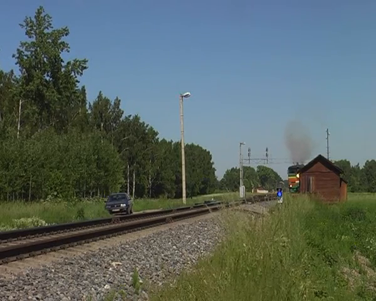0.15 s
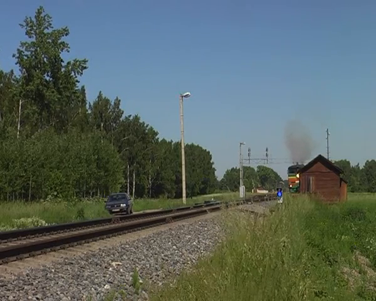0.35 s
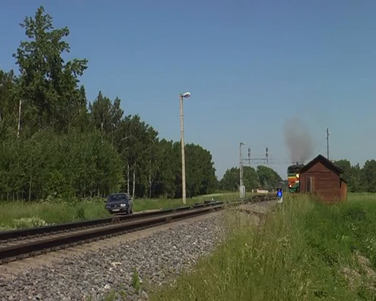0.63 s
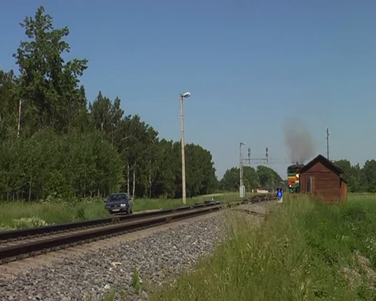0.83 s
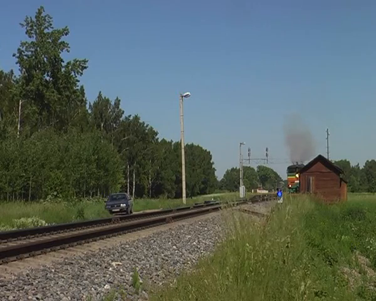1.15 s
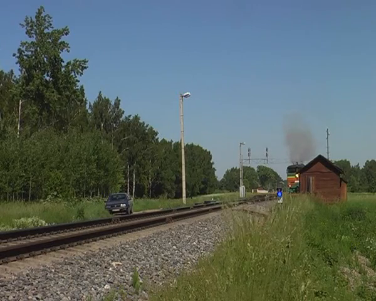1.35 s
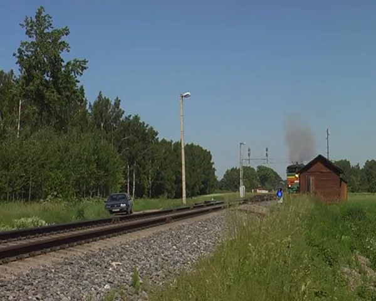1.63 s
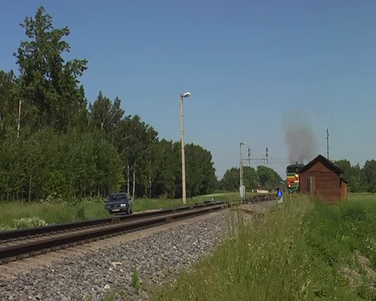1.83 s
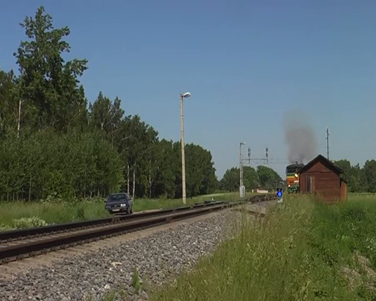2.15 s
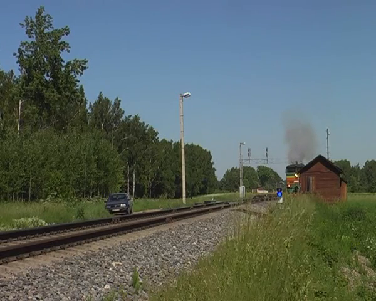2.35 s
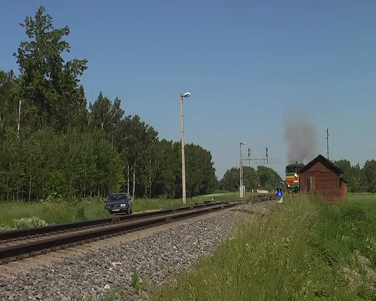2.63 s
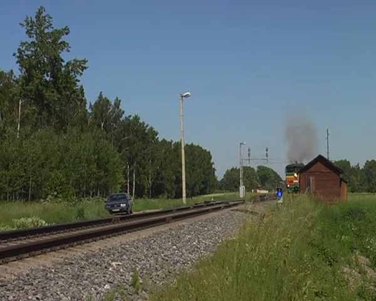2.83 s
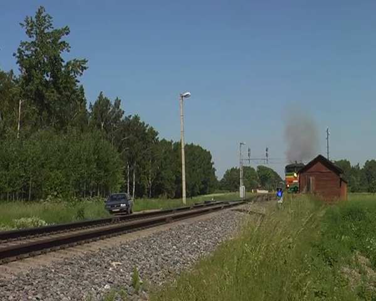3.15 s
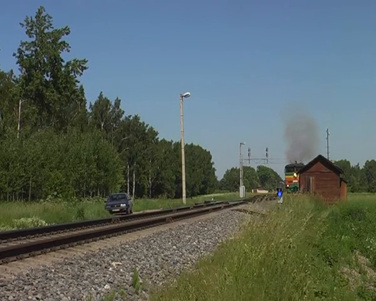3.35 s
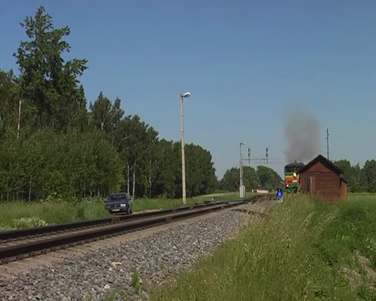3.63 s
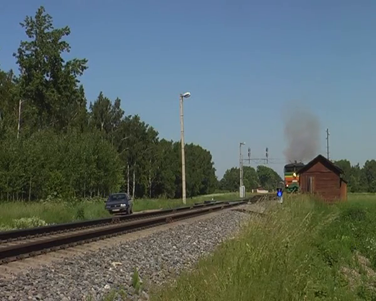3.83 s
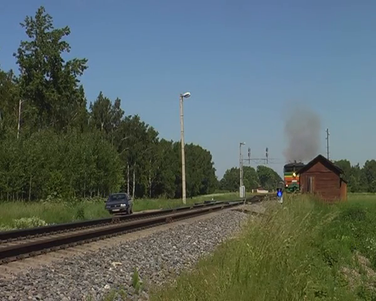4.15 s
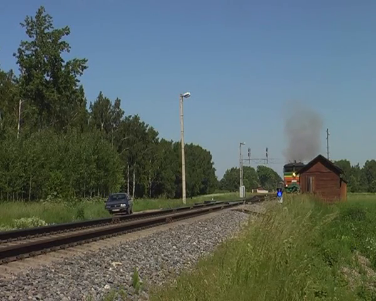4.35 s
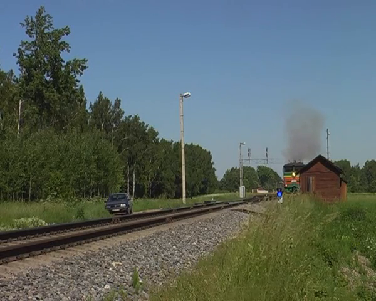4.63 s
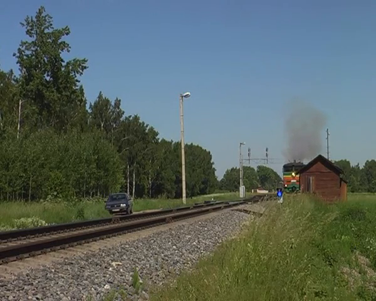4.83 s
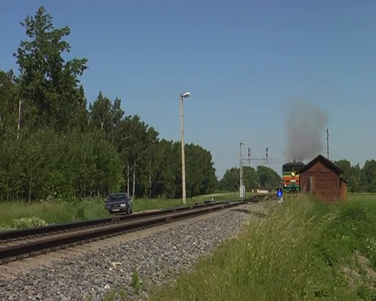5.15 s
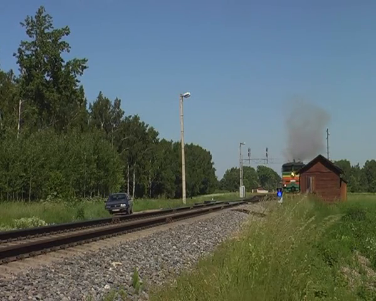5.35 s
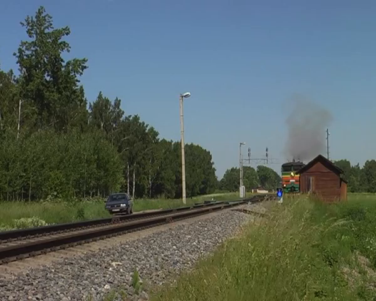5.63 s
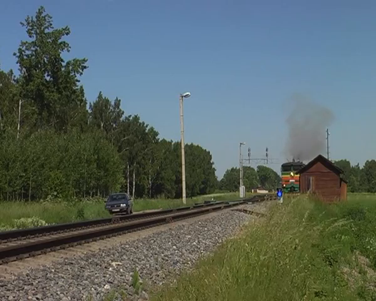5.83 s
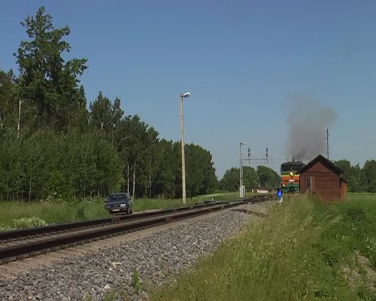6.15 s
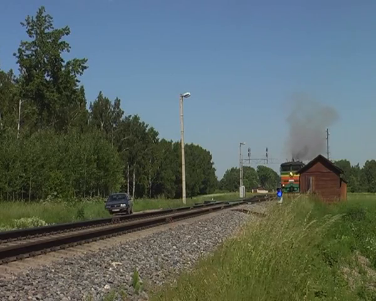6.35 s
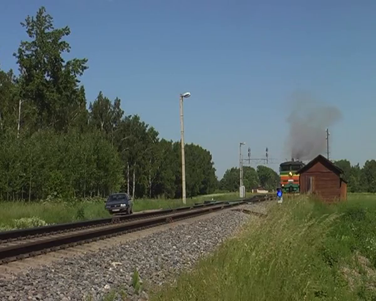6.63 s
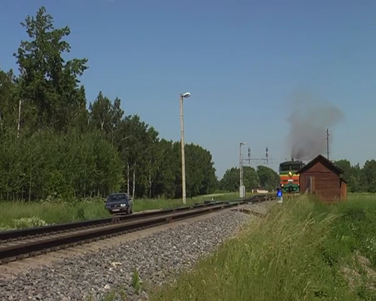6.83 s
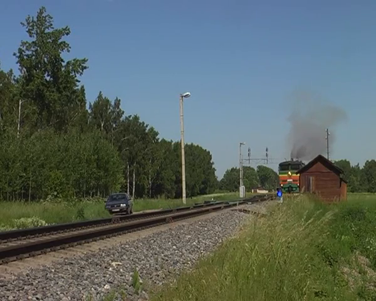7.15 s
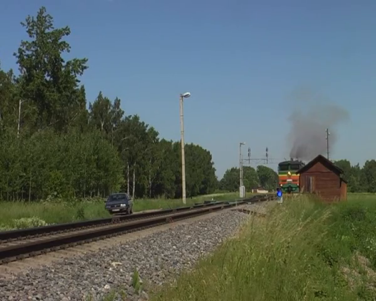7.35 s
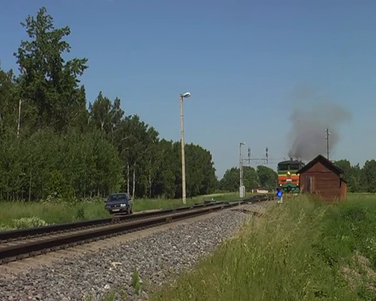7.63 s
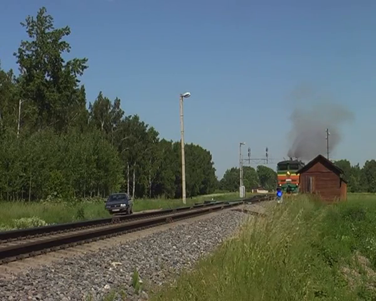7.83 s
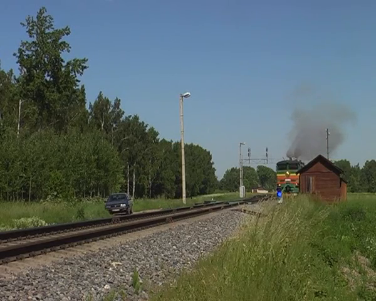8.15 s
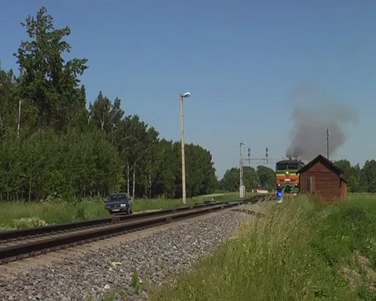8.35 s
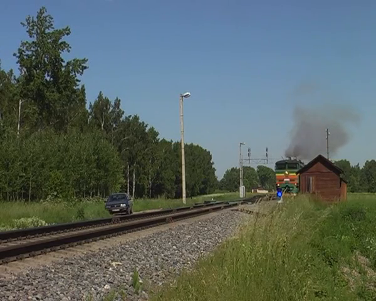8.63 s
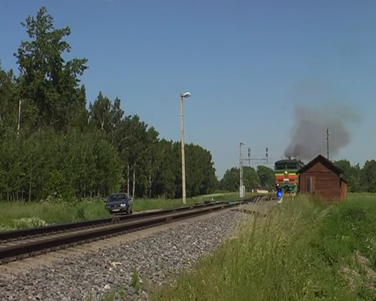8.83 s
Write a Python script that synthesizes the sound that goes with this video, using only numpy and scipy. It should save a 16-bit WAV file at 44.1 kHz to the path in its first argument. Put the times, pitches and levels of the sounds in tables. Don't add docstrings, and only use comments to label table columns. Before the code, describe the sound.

Low, pulsing diesel drone from a distant freight train grows gradually throughout, its two engines drifting in speed against each other. Quick bird trills, chatter and falling notes sound close to the left, with softer chirps from the trees. Dry grass snaps occasionally. As the locomotive clears a small trackside hut, the exhaust becomes fuller and the blower and gear whines rise. Open country air, with faint hiss at the microphone.

```python
import sys
import numpy as np
from scipy import signal
from scipy.fft import rfft, irfft
from scipy.io import wavfile
from scipy.ndimage import uniform_filter1d

SR = 44100
rng = np.random.default_rng(int(sys.argv[2]) if len(sys.argv) > 2 else 0)


def gain_from_db(level_db):
    decades = np.asarray(level_db, float) / 20
    return 10 ** decades


def to_wav(s):
    ch = np.atleast_2d(s).T
    pcm = np.round(np.clip(ch, -1, 1) * 32767)
    wavfile.write(sys.argv[1], SR, pcm.astype(np.int16))


N = 396900
PORTS = np.array([[1], [-1]])


def evened(x):
    return x / np.sqrt(np.mean(x ** 2) + 1e-20)


def read(points, hz):
    f, value = np.transpose(points)
    return np.interp(np.log(hz + 1), np.log(f + 1), value)


def curves(rows):
    s, *columns = np.transpose(rows)
    return [np.interp(np.arange(N) / SR, s, column) for column in columns]


def add(mix, start_s, sound):
    part = mix[:, round(start_s * SR):][:, :sound.shape[1]]
    part += sound[:, :part.shape[1]]


def drift(per_s, size=1):
    knots = np.arange(0, N / SR + 1, .5 / per_s)
    values = rng.standard_normal(400)[:len(knots)]
    return np.interp(np.arange(0, N, size) / SR, knots, values) * 0.42


def unsteady(length, size):
    return evened(uniform_filter1d(rng.standard_normal(8000), size=size))[:length]


def resonate(x, hz, width_hz):
    turn = np.exp(2j * np.pi * np.cumsum(hz) / SR)
    r = np.exp(-np.pi * width_hz / SR)
    return 2 * (turn * signal.lfilter([1 - r], [1, -r], x / turn)).real


def motor():
    drum_hz, level_db = 300, -88.0
    multiples = [27, 28, 29, 30, 33, 34, 36, 37]
    t, out = np.arange(N) / SR, 0
    for k in multiples:
        tone_db = level_db - 0.67 * (k - multiples[0])
        out = out + np.sqrt(2) * gain_from_db(tone_db) * np.sin(2 * np.pi * k * drum_hz * t + k * k)
    return out


# start_s, peak_db, left_minus_right_db
GRASS_SNAPS = [
    (0.2369, -43, -4),
    (4.8597, -41, 2),
    (5.224, -46, -0.5),
    (6.288, -45.5, -3.5),
    (6.9223, -46, 0),
]


def grass():
    out, t = np.zeros((2, N)), np.arange(300) / SR
    hz, width_hz = 7000 + 0 * t, 6000
    for start_s, peak_db, lean_db in GRASS_SNAPS:
        ring = resonate(resonate(rng.standard_normal(300), hz, width_hz), hz, width_hz)
        add(out, start_s, gain_from_db(peak_db + 0.5 + lean_db * PORTS / 2) * ring * np.exp(-t / .001))
    return out


# pitch_hz, left_minus_right_db
BIRD_LEAN = [(2500, 5.5), (3500, 5), (4200, 3.5), (5000, -0.5), (6000, -3.5)]


def sung(wave, hz, level_db, edge=0.2):
    lean_db = read(BIRD_LEAN, hz) * PORTS / 2
    return gain_from_db(level_db + lean_db) * evened(wave) * signal.windows.tukey(len(wave), min(edge, 1))


def throat(hz, level_db, flutter_db, wobble_hz, edge=.18):
    hz = hz + wobble_hz * unsteady(len(hz), 90)
    angle = 2 * np.pi * np.cumsum(hz) / SR
    flutter = gain_from_db(flutter_db * unsteady(len(hz), 150))
    return sung((np.sin(angle) + 0.014 * np.sin(2 * angle)) * flutter, hz, level_db, edge)


def whistle(length_s, start_hz, middle_hz, end_hz, level_db, flutter_db=2.5):
    bend = np.polyfit([0, .5, 1], [start_hz, middle_hz, end_hz], 2)
    hz = np.polyval(bend, np.linspace(0, 1, round(length_s * SR)))
    return throat(hz, level_db, flutter_db, wobble_hz=52)


def glide(length_s, start_hz, end_hz, level_db, flutter_db=1.0):
    middle_hz = start_hz + .7 * (end_hz - start_hz)
    return whistle(length_s, start_hz, middle_hz, end_hz, level_db, flutter_db)


def hook(length_s, start_hz, held_hz, level_db, bend_s=.003, flutter_db=-1.5):
    t = np.arange(round(length_s * SR)) / SR
    hz = held_hz + (start_hz - held_hz) * np.exp(-t / bend_s)
    return throat(hz, level_db, flutter_db, wobble_hz=25, edge=.1)


def trill(length_s, start_hz, end_hz, level_db, beats_per_s, sweep=0.33, dip=0.55):
    swing_hz = 8200.0 * sweep / np.sqrt(beats_per_s)
    beat = 2 * np.pi * beats_per_s * np.arange(round(length_s * SR)) / SR
    hz = np.linspace(start_hz, end_hz, len(beat)) - swing_hz * np.cos(beat - .6)
    hz = hz + 70 * unsteady(len(beat), 60)
    angle = 2 * np.pi * np.cumsum(hz) / SR
    wave = (np.sin(angle) + 0.015 * np.sin(2 * angle)) * (1 - dip * np.cos(beat))
    return sung(wave, hz, level_db, edge=0.31)


def rasp(length_s, start_hz, end_hz, width_hz, level_db):
    hz = np.linspace(start_hz, end_hz, round(length_s * SR))
    breath = rng.standard_normal(3000)[:len(hz)]
    for width in (width_hz, width_hz, 2 * width_hz):
        breath = resonate(breath, hz, width)
    return sung(breath, hz, level_db)


# start_s, length_s, pitch_hz, level_db
WOOD_HELD = [(0.668, .031, 4550, -51), (0.837, .045, 3450, -54), (0.952, .03, 4600, -52.5),
             (2.153, 0.1, 4620, -52.5), (2.449, 0.063, 4330, -50), (2.521, .04, 4310, -55),
             (2.707, 0.056, 4440, -52.5), (3.838, 0.071, 6430, -60), (3.919, .06, 6370, -58),
             (4.131, .095, 6430, -62), (4.271, .028, 6090, -61), (4.43, .04, 4600, -59),
             (4.422, 0.071, 6730, -58), (5.022, 0.05, 3500, -46), (5.137, .032, 4550, -48),
             (5.313, .022, 3480, -47.5), (5.351, .057, 3540, -54.5), (5.401, 0.04, 4490, -50),
             (5.859, 0.03, 4510, -51.5), (6.524, .031, 3940, -53), (6.576, 0.062, 3910, -55),
             (6.725, 0.071, 5860, -56.5), (6.796, 0.17, 5760, -61), (7.385, 0.1, 5830, -62),
             (7.603, .045, 2295, -53), (5.265, .03, 3400, -51.5)]
# start_s, length_s, start_hz, end_hz, level_db
WOOD_GLIDES = [(0.699, .034, 4530, 3900, -51), (0.987, .035, 4500, 3960, -52),
               (2.676, 0.032, 3510, 4560, -54), (2.927, 0.11, 3210, 3750, -62),
               (4.328, .03, 7230, 6440, -57), (4.469, 0.065, 6760, 5400, -57.5),
               (4.601, 0.097, 6940, 5730, -58.5), (4.67, 0.042, 5980, 4720, -55.5),
               (4.772, .092, 6730, 5590, -59), (4.84, .035, 5950, 4780, -51.5),
               (5.164, .044, 4430, 3600, -52.5), (5.554, 0.033, 4330, 4010, -49.5),
               (5.577, .022, 4000, 3600, -50), (5.596, .055, 3650, 2980, -56.5),
               (5.308, .015, 3780, 3520, -49.5), (5.671, 0.056, 3600, 2850, -54),
               (0.673, .02, 3110, 3110, -52.5), (0.797, .035, 3100, 3330, -58),
               (.832, .012, 3790, 3570, -55), (1.512, .025, 4410, 4400, -57.5),
               (1.592, .05, 3200, 2880, -59), (1.7, .05, 2464, 3100, -58), (1.76, .03, 3170, 2970, -59),
               (3.34, .012, 5750, 5750, -54), (3.386, .012, 3600, 3470, -53.5),
               (3.4, .018, 4620, 4400, -55), (3.678, .014, 4930, 4950, -58.5),
               (3.513, .01, 4980, 4950, -59), (3.515, .008, 4030, 4400, -54), (5.713, .05, 2940, 2940, -64),
               (5.845, .022, 4990, 4470, -53), (5.885, .016, 4790, 5400, -54),
               (7.677, .014, 3270, 3210, -44), (7.827, .012, 3490, 3490, -52),
               (7.85, 0.013, 3840, 4080, -49), (7.958, .008, 4440, 4460, -49.5),
               (8.053, .022, 2500, 2340, -46.5), (7.575, .025, 3120, 3050, -53),
               (.168, .008, 2400, 2150, -50), (3.835, .06, 5950, 5850, -61.5),
                (4.0, .035, 7050, 6900, -63), (4.275, .055, 7050, 6950, -64),
                (4.125, .012, 3200, 3900, -52), (4.14, .022, 5400, 5600, -59),
                (4.482, .012, 7000, 6600, -60), (4.135, .02, 6950, 6500, -65),
                (5.435, .018, 4600, 3350, -51), (5.4, .012, 4700, 5000, -55.5),
                (5.505, .018, 4450, 4600, -58), (5.65, .018, 3300, 3350, -58.5),
                (7.797, .014, 7600, 8500, -62), (7.845, .018, 6200, 6700, -58),
                (6.4, .01, 7600, 5200, -53.5), (7.032, .012, 5300, 4500, -44)]


def wood_birds(flutter_db=2.5):
    out = np.zeros((2, N))
    for start_s, length_s, hz, level_db in WOOD_HELD:
        add(out, start_s, hook(length_s, hz, hz, level_db, flutter_db=flutter_db))
    for start_s, *note in WOOD_GLIDES:
        add(out, start_s, glide(*note, flutter_db))
    first_s, every_s = 4.957, .123
    for k in range(5):
        rising = hook(.043, 3450.5, 4750.5, -47.5, bend_s=.016, flutter_db=flutter_db)
        add(out, first_s + k * every_s, rising)
    return out


# start_s, length_s, start_hz, end_hz, level_db
FALLS = [(0.291, 0.0092, 6000, 5880, -42.5), (0.3, 0.018, 5260, 4370, -33.5),
         (0.565, 0.0072, 4160, 3630, -48), (2.905, .015, 4310, 3770, -42.5), (3.062, .023, 3750, 3760, -45),
         (3.832, 0.042, 5840, 4100, -54.5), (3.3, .025, 4660, 4330, -37), (6.933, 0.033, 5560, 3840, -38),
         (7.157, .016, 4250, 3320, -39), (7.174, .012, 4440, 2940, -39.5), (7.056, .024, 4100, 3840, -35),
         (7.447, .01, 5030, 3660, -41), (7.464, .008, 4800, 3300, -41), (7.8, .018, 5710, 4850, -44.5),
         (7.984, 0.0057, 5740, 5570, -39.5), (7.994, .011, 5540, 4580, -38.5),
         (3.175, .046, 4100, 3520, -35.5), (7.185, .007, 3660, 2930, -39)]
RISES = [(2.891, 0.011, 4380, 4690, -45), (3.017, .017, 3430, 3710, -39), (3.153, .02, 3420, 3510, -34),
         (3.43, 0.021, 2360, 2560, -47.5), (6.873, 0.012, 3700, 4530, -43.5),
         (7.198, .018, 2970, 3440, -38), (7.293, .023, 3560, 3660, -55), (7.475, 0.028, 3290, 3530, -39.5),
         (7.813, 0.021, 4650, 5830, -43.5), (7.835, .02, 4710, 5930, -45), (7.953, 0.006, 3970, 5820, -44)]
# start_s, length_s, start_hz, held_hz, level_db
HOOKS = [
    (3.044, .026, 4450, 3800, -34.5),
    (6.891, .016, 5930, 4700, -42.5),
    (6.914, 0.016, 5870, 4900, -36),
    (7.223, 0.035, 4140, 3714, -35.5),
    (7.516, 0.033, 4170, 3790, -35.5),
]
# start_s, length_s, turning_hz, depth_hz, level_db
DIPS = [
    (3.454, .013, 3360, 699, -44.5),
    (3.477, .011, 3280, 1200, -44),
    (3.497, .015, 3410, 1099, -45),
    (7.343, .031, 5880, -650, -40),
    (5.818, 0.028, 5140, -300, -49.5),
    (7.856, .014, 4840, 249, -43.5),
    (7.961, 0.008, 5830, -150, -42.5),
]
# start_s, length_s, centre_hz, level_db, beats_per_s
TRILLS = [(.318, 0.052, 3720, -36, 80), (.425, .048, 3095, -38.5, 98), (3.01, 0.0077, 3630, -43, 220),
          (3.135, 0.019, 3400, -48, 160), (3.86, 0.058, 3800, -46, 88), (3.975, 0.04, 3150, -46.5, 130),
          (4.31, 0.07, 4540, -43.5, 120), (4.375, .05, 4640, -55, 100), (4.435, .045, 2970, -49, 66),
          (7.319, 0.037, 4920, -41, 120), (3.277, 0.026, 4780, -45, 120), (7.04, 0.026, 4170, -37.5, 120)]
SINKING_TRILLS = [
    (.036, 0.043, 3310, -33, 238),
    (3.333, .032, 3940, -46.5, 210),
    (3.567, .037, 3320, -40, 228),
    (7.692, 0.037, 3020, -42.5, 98.5),
    (8.004, .035, 3610, -44, 89.6),
    (8.039, .022, 3070, -44, 90),
]
# start_s, length_s, pitch_hz, width_hz, level_db
RASPS = [(3.335, .022, 7250, 2426, -60), (3.68, 0.013, 4430, 510, -53), (3.727, .045, 4890, 1500, -56),
         (5.894, .01, 2865, 704, -48), (7.322, .037, 9000, 3000, -68.5), (7.35, .012, 11700, 603, -65.5),
         (7.788, 0.027, 7900, 3020, -62), (7.878, .015, 10100, 1200, -64),
         (8.051, .027, 10320, 1200, -63.5), (7.906, .012, 10500, 1200, -68),
         (7.947, .016, 10600, 1300, -67), (8.085, .01, 10400, 900, -66), (7.822, .02, 11500, 600, -70),
         (8.925, .012, 11000, 1500, -72)]
# steps_start_s, scratch_start_s
CHATTER = [
    (.137, .19),
    (.534, .582),
]
# delay_s, length_s, start_hz, end_hz, level_db
CHATTER_STEPS = [
    (0, .011, 5400, 5300, -48),
    (.002, .012, 4980, 4920, -48),
    (.004, .013, 4480, 4400, -48.5),
    (.006, .022, 3280, 3490, -45),
    (0.012, 0.019, 2790, 2690, -48.5),
]
CHATTER_SCRATCH = [
    (0.00053, 0.018, 3400, 4400, -39.5),
    (.022, 0.013, 4300, 5750, -44),
    (0.022, 0.011, 7500, 8800, -62.5),
]


def warbler():
    out = np.zeros((2, N))
    for start_s, *note in FALLS + RISES:
        add(out, start_s, glide(*note))
    for start_s, *note in HOOKS:
        add(out, start_s, hook(*note))
    for start_s, length_s, hz, depth_hz, level_db in DIPS:
        add(out, start_s, whistle(length_s, hz + depth_hz, hz, hz + depth_hz, level_db))
    for table, sink_hz_per_s in ((TRILLS, 0), (SINKING_TRILLS, 25000)):
        for start_s, length_s, hz, level_db, beats_per_s in table:
            half_hz = sink_hz_per_s * length_s / 2
            add(out, start_s, trill(length_s, hz + half_hz, hz - half_hz, level_db, beats_per_s))
    for start_s, length_s, hz, width_hz, level_db in RASPS:
        add(out, start_s, rasp(length_s, hz, hz, width_hz, level_db))
    for steps_s, scratch_s in CHATTER:
        for delay_s, *note in CHATTER_STEPS:
            add(out, steps_s + delay_s, glide(*note))
        for delay_s, length_s, start_hz, end_hz, level_db in CHATTER_SCRATCH:
            add(out, scratch_s + delay_s, rasp(length_s, start_hz, end_hz, 1600, level_db))
    return out


def echoes(x, t60_s, first_s=0.0037):
    t = np.arange(SR // 2) / SR
    tail = rng.standard_normal((2, len(t))) * gain_from_db(-60 * t / t60_s) * (t > first_s)
    return signal.fftconvolve(x, tail / np.linalg.norm(tail[0]), axes=1)[:, :N]


def birds():
    near, far = warbler(), wood_birds()
    return near + gain_from_db(-10.5) * echoes(near, 0.53) + far + gain_from_db(-5.5) * echoes(far, 0.29)


# pitch_hz, likeness
PORT_LIKENESS = [(60, 0.35), (280, 1), (450, 0.93), (900, 0.83), (2100, 0.69), (5000, 0.78), (7000, 0.97),
                 (9500, .5), (12000, .25)]


def noise(spectrum, patchy_db):
    frames, hz = N // 256 + 5, np.fft.rfftfreq(1024, 1 / SR)
    a, b, c, d, patches = rng.standard_normal((frames, 513, 5)).T
    patches = uniform_filter1d(patches, size=10, axis=0)
    patches = evened(uniform_filter1d(patches, size=12, axis=1))
    same = np.clip(read(PORT_LIKENESS, hz), -1, 1)[:, None]
    left = a + 1j * b
    right = same * left + np.sqrt(1 - same ** 2) * (c + 1j * d)
    z = np.array([left, right]) * gain_from_db(read(spectrum, hz)[:, None] + patchy_db * patches)
    return evened(signal.istft(z, nperseg=1024, noverlap=768)[1][:, :N])


APPROACH_DB_PER_S = 0.35
# pitch_hz, level_db
RUMBLE = [(35, -44), (55, -20.5), (90, -16), (150, -5), (220, -6.5), (265, -19.5), (330, -33), (420, -42),
          (700, -100)]
# pitch_hz, level_db per Hz
BODY = [(180, -23.5), (300, -9.5), (337, -12.5), (385, -15.5), (515, -8), (883, -12), (1070, -15),
        (1460, -16.5), (1590, -14.5), (1750, -22.5), (3000, -25.5), (3900, -60), (6600, -120)]
# pitch_hz, level_db per Hz
HISS = [(1100, -22), (1800, 2.5), (2900, 1.5), (3600, 1), (5150, -3), (5400, -7), (7100, -10), (7900, -16),
        (9100, -16), (9700, -20.5), (12500, -27), (15500, -33.5)]


def roar(firing):
    near_db = APPROACH_DB_PER_S * np.arange(N) / SR
    pressure = uniform_filter1d(abs(firing[0]), size=400) - abs(firing[0]).mean()
    pump = 1 + 0.033 * evened(pressure)
    rumble = gain_from_db(-36 + 0.6 * (near_db - near_db.mean())) * noise(RUMBLE, patchy_db=1.0)
    body = gain_from_db(-43.5 + near_db) * pump * noise(BODY, patchy_db=0.76)
    hiss = gain_from_db(-52 + 1.17 * near_db) * noise(HISS, patchy_db=1.6)
    return rumble + body + hiss


# time_s, pitch_hz, level_db
BLOWER = [
    (0, 997, -70),
    (.7, 1024, -52.5),
    (2, 1105, -56.5),
    (4, 1230, -56),
    (6, 1345, -53),
    (6.6, 1394, -53.5),
    (8, 1475, -55.5),
    (9, 1576, -51),
]
REAR_BLOWER = [
    (0, 1278, -71),
    (6.5, 1441, -57.5),
    (7.2, 1530, -72),
    (8, 1577, -60.5),
    (9, 1700, -55),
]
TRACTION = [
    (0, 533, -53.5),
    (4, 536, -55),
    (5, 524, -49),
    (6.1, 556, -45.5),
    (7.4, 588, -52),
    (8.2, 647, -49),
    (8.7, 708, -49),
    (9, 726, -52),
]


def whine(rows, width_hz):
    hz, level_db = curves(rows)
    ring = resonate(resonate(rng.standard_normal(N), hz, width_hz), hz, width_hz)
    return gain_from_db(level_db + 2.2 * drift(5.0)) * evened(ring) * np.ones((2, 1))


TONE_STEP = 21


def tones(turns_per_s, multiples, levels_db, starts, waver_db=1.4, slip=.105):
    angle, out = 2 * np.pi * np.cumsum(turns_per_s)[::TONE_STEP] / SR, 0
    for k, level_db, start in zip(multiples, levels_db, starts):
        apart = slip * (drift(0.91, TONE_STEP) + np.sign(rng.standard_normal())) * PORTS
        lag = apart + 1.1 * drift(0.599, TONE_STEP)
        level = np.sqrt(2) * gain_from_db(level_db + waver_db * drift(1.233, TONE_STEP))
        out = out + level * np.cos(k * angle + 2 * np.pi * start + lag)
    return signal.resample_poly(out, TONE_STEP, 1, axis=1, padtype="line")[:, :N]


# time_s, front_turns_per_s, rear_turns_per_s
SPEED = [(0.0, 7.866, 8.163), (1.0, 8.155, 8.36), (2.0, 8.37, 8.52), (2.7, 8.44, 8.6), (3.2, 8.385, 8.6),
         (4.0, 8.17, 8.513), (4.6, 8.07, 8.457), (5.2, 8.12, 8.472), (6.0, 8.305, 8.556),
         (7.0, 8.603, 8.686), (8.0, 8.9, 8.755), (9.0, 9.11, 8.79)]
# multiple of turn rate, front_far_db, front_beside_hut_db, front_near_db, rear_far_db
EXHAUST_TONES = [(6, -55, -52, -47, -58), (7, -37.5, -34, -32, -40), (8, -54, -52, -47, -61),
                 (9, -56, -52, -52, -62), (10, -33, -32, -30, -36), (11, -33.5, -31.5, -32, -39),
                 (12, -39.5, -43, -44, -48), (13, -30, -30, -29, -42), (14, -43, -38, -29, -43),
                 (15, -58, -46, -43, -66), (16, -30.5, -29, -26.5, -34), (17, -31, -30, -26.5, -38),
                 (18, -38, -38, -36, -47), (19, -33.5, -31.5, -28, -38), (20, -39, -33, -31, -52),
                 (21, -38, -40, -48, -51), (22, -43.5, -35, -34, -55), (23, -36, -33, -34, -49),
                 (24, -31.5, -30, -30, -38), (25, -32, -33, -34, -59), (26, -36.5, -33, -46, -48),
                 (27, -34.5, -33.5, -42, -51), (28, -47, -52, -56, -58), (29, -41, -39, -40, -52),
                 (30, -50, -45, -50, -60), (31, -53, -48, -46, -57), (32, -49.5, -47, -47, -56),
                 (33, -49, -50, -49, -62), (34, -55, -50, -62, -65), (35, -48.5, -50, -56, -67),
                 (36, -56, -58, -60, -67), (37, -62, -57, -60, -68), (38, -56, -51, -53, -68),
                 (39, -55.5, -58, -66, -68), (40, -57, -53, -65, -70), (42, -62, -62, -62, -72)]
# multiple of turn rate, far_db, beside_hut_db, near_db
GEAR_TONES = [(61, -60, -63, -57), (62, -59, -58, -58), (63, -51, -59, -58.5), (65, -62, -57, -58),
              (67, -61, -52.5, -62), (68, -62, -55.5, -58), (69, -62, -60, -61), (71, -62, -61, -62),
              (72, -66, -59, -62), (73, -63, -68, -56), (75, -56, -62.5, -56), (78, -67, -59, -59),
              (79, -65, -62, -63), (82, -59.5, -64, -62)]
# multiple, centre_s, change_db
SAGS = [(9, .3, -6), (15, .9, -4), (16, .3, -4), (19, .3, -3), (37, .4, -4), (13, 3, -5), (20, 3, -6),
        (26, 3, -7), (27, 2.9, -4), (29, 2.9, -4.5), (30, 2.5, -8), (34, 2.5, -8), (35, 2.8, -6),
        (36, 2, -5), (37, 3.5, -9), (40, 3.1, -12), (9, 4.5, -7), (15, 4.8, -4), (19, 4.8, -3),
        (22, 4.5, -6), (32, 4.2, -4), (14, 5.5, -5), (30, 5.5, 5), (13, 7.3, -5), (27, 5.4, 1.5),
        (35, 7.5, -5), (36, 7, -5), (37, 7.5, -5), (39, 7.5, -10), (40, 7.1, -6), (28, 8.6, -6),
        (63, .3, -6), (75, .3, -9)]
# crank_turns, strength_db
FIRINGS = [
    (.091, 0),
    (.497, 0),
    (.639, -2.4),
    (.726, -3.3),
    (.852, 0),
]
# multiple, level_db
CLATTER = [(41, -67), (44, -73), (52, -70), (60, -66), (66, -65), (76, -66), (88, -66.5), (95, -70),
           (104, -75)]


def engines():
    front_clear_s, rear_clear_s = [4.5, 6.3, 8.3], [6.0, 8.3]
    pipe_lag_turns, rear_lead_turns = .276, .336
    sag_s = .65
    front, rear = curves(SPEED)
    t = np.arange(0, N, TONE_STEP) / SR
    front_db = []
    for row in EXHAUST_TONES + GEAR_TONES:
        sag_db = sum(db * np.exp(-((t - s) / sag_s) ** 2) for k, s, db in SAGS if k == row[0])
        front_db.append(np.interp(t, front_clear_s, row[1:4]) + sag_db)
    rear_db = [row[4] + np.interp(t, rear_clear_s, [0, 2.5]) for row in EXHAUST_TONES]
    k = np.round([row[0] for row in EXHAUST_TONES + GEAR_TONES])
    pulses = sum(gain_from_db(db) * np.exp(-2j * np.pi * k * turn) for turn, db in FIRINGS)
    starts = np.angle(pulses) / (2 * np.pi) - pipe_lag_turns
    exhaust = tones(front, k, front_db, starts)
    exhaust = exhaust + tones(rear, k, rear_db, starts + rear_lead_turns * k)
    between = np.setdiff1d(np.arange(CLATTER[0][0], CLATTER[-1][0]), k)
    clatter_db = np.interp(between, *np.transpose(CLATTER))[:, None] + APPROACH_DB_PER_S * t
    return exhaust + tones(front, between, clatter_db, rng.random(len(between)), waver_db=9, slip=.2)


# pitch_hz, left_minus_right_db
TRAIN_LEAN = [(60, .9), (170, -.3), (300, -1.9), (900, -1.1), (8000, -.1)]


def train():
    firing = engines()
    whines = whine(BLOWER, 46) + whine(REAR_BLOWER, 35) + whine(TRACTION, 70)
    lean_db = read(TRAIN_LEAN, np.fft.rfftfreq(N, 1 / SR)) * PORTS / 2
    return irfft(rfft(firing + roar(firing) + whines) * gain_from_db(lean_db), N)


def scene():
    return motor() + grass() + birds() + train()


def band_limit(x):
    return signal.sosfilt(signal.butter(12, 15720, fs=SR, output="sos"), x)


def record(dry):
    mix = dry + gain_from_db(-81.0) * np.diff(rng.standard_normal((2, N + 1)))
    mix = mix * np.sin(np.pi / 2 * np.minimum(np.arange(N) / 150, 1)) ** 2
    return band_limit(mix)


dry = scene()
out = record(dry)
to_wav(out)
```